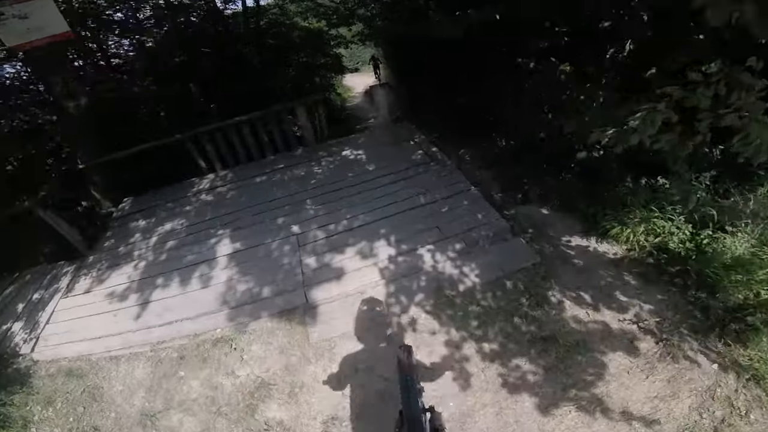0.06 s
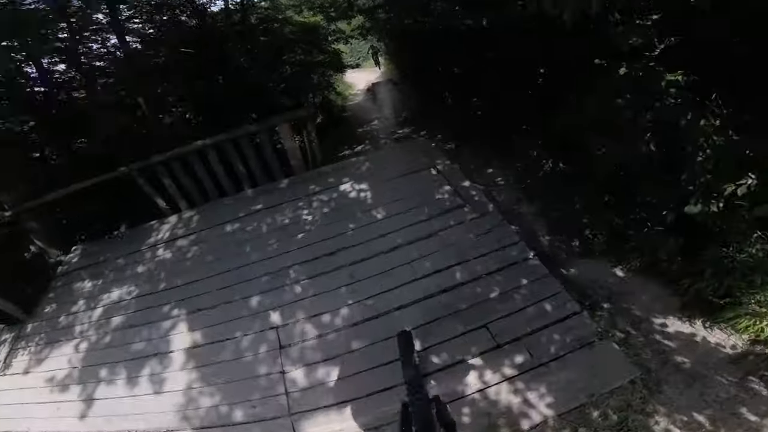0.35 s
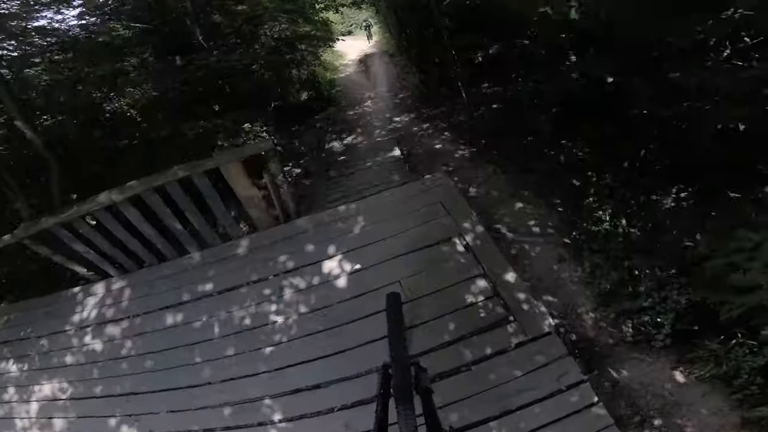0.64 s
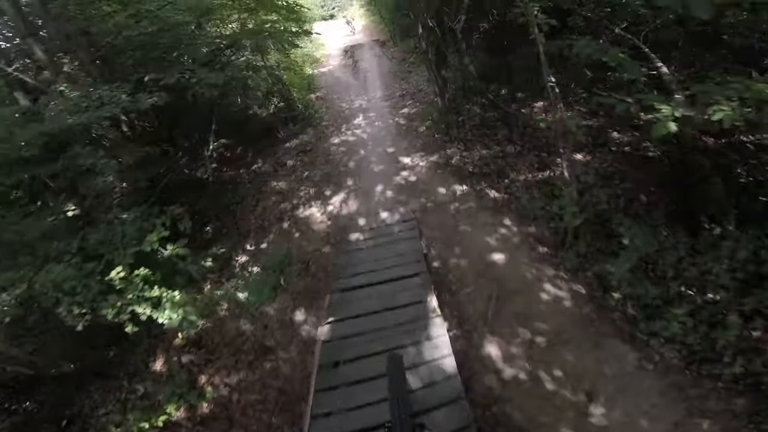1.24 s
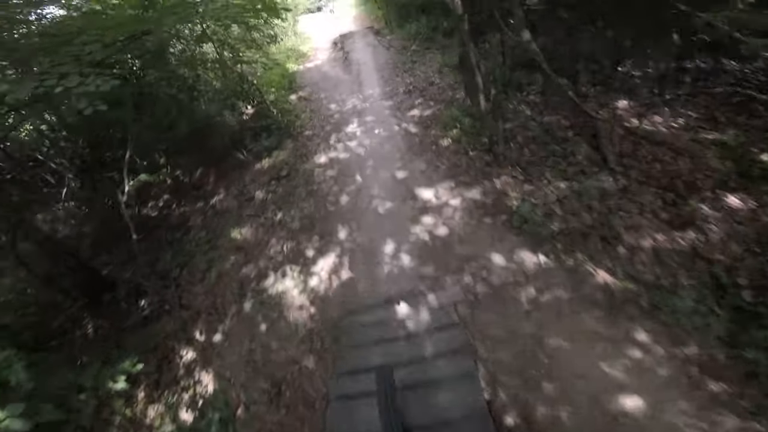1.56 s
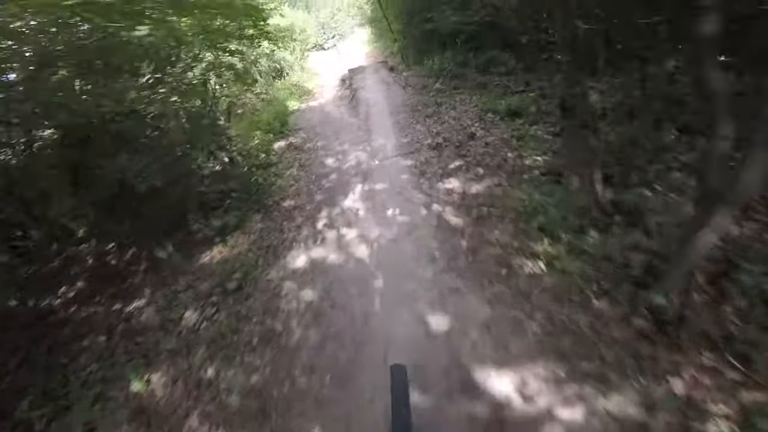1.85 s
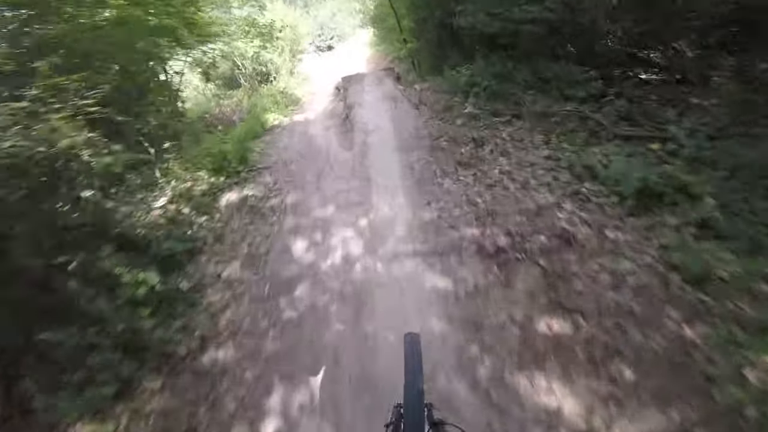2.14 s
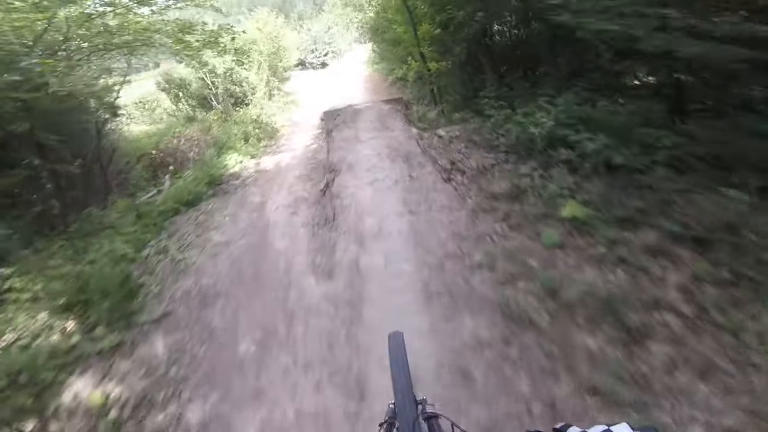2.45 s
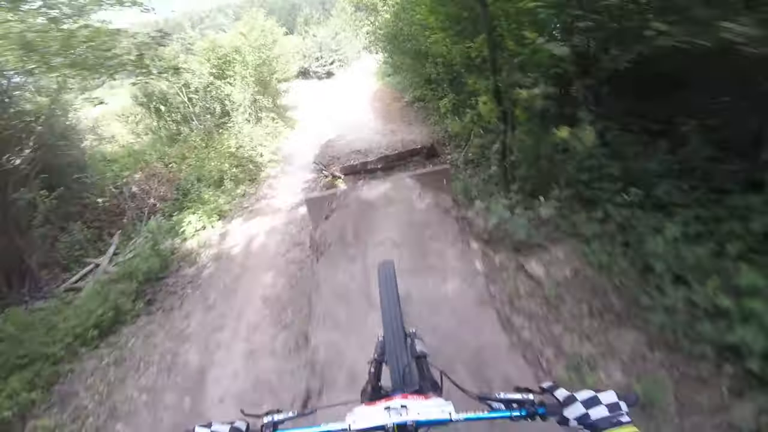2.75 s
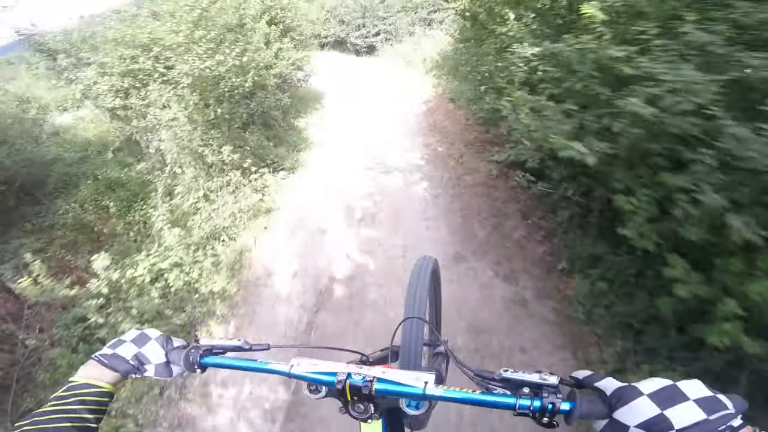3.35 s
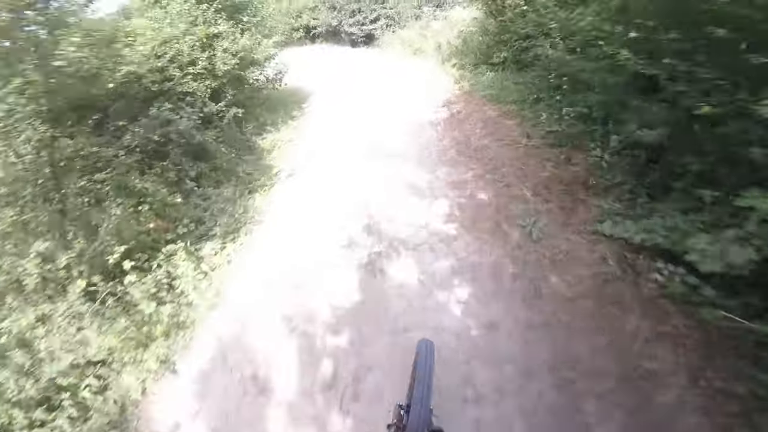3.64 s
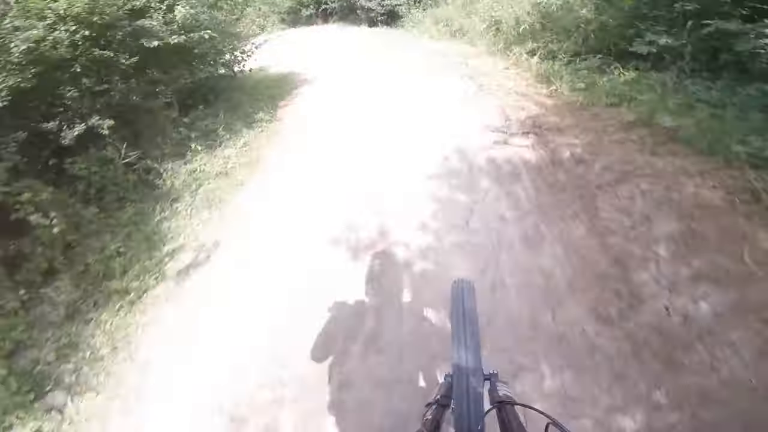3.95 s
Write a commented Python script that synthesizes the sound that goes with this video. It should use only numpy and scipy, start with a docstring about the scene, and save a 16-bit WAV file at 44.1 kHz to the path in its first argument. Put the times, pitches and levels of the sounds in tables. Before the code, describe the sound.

A mountain bike thumps over wooden planks, then rattles along a dirt trail with chain clinks and gritty tyre noise. Wind rushes on the rider's microphone at a jump, and the tyres land in a spray of grit.

```python
"""Mountain bike over planks and a jump

From a camera microphone on the rider, close to the bike: wheels thump over a wooden deck and a narrow
plank ramp, rattle onto dirt, press through the lip of a jump, coast through the air and land in a spray
of grit. Chain and fittings clink, the freewheel ticks, a brake disc sings briefly against its pad
and wind buffets the microphone."""
import sys
import numpy as np
from scipy import signal
from scipy.fft import rfft, irfft, next_fast_len
from scipy.io import wavfile
from scipy.ndimage import uniform_filter1d, map_coordinates

SR = 44100
rng = np.random.default_rng(int(sys.argv[2]) if len(sys.argv) > 2 else 0)


def transcribe(signal):
    """Save signal, clipped to [-1, 1], as a 16-bit WAV file at the path in sys.argv[1]."""
    frames = np.atleast_2d(signal).T
    limited = np.clip(frames, -1, 1)
    pcm = np.round(limited * 32767).astype(np.int16)
    wavfile.write(sys.argv[1], SR, pcm)


N = 176400


def amp(db):
    """Decibels to gain."""
    return 10 ** (np.asarray(db) / 20)


def unit(x):
    """x at rms 1."""
    return x / np.sqrt(np.mean(x ** 2) + 1e-20)


def curve(rows):
    """(s, value) points joined, one value per sample."""
    return np.interp(np.arange(N) / SR, *np.transpose(rows))


def wobble(rate):
    """A smooth random curve, rate knots a second."""
    return map_coordinates(rng.standard_normal(2048), [np.arange(N) * rate / SR], mode="wrap")


def coloured(x, points):
    """x through a causal filter with the given (Hz, dB) shape."""
    m = 2 * next_fast_len(len(x) // 2 + 4096)
    hz, db = np.transpose(points)
    shape = np.interp(np.log(np.fft.rfftfreq(m, 1 / SR) + 1), np.log(hz + 1), db)
    cep = irfft(np.log(amp(shape)), m)
    cep[1:m // 2] *= 2
    cep[m // 2 + 1:] = 0
    return irfft(rfft(x, m) * np.exp(rfft(cep)), m)[:len(x)]


def noise(points):
    """Coloured noise of rms 1."""
    return unit(coloured(rng.standard_normal(N), points))


def fade(t, t60):
    """Exponential decay, 60 dB down after t60."""
    return np.exp(-np.log(1000) * t / max(t60, 1e-4))


def burst(envelope, points):
    """A cluster of tiny contacts under an envelope, coloured, with rms 1 at its loudest."""
    x = coloured(envelope * rng.choice([-1, 1], len(envelope)), points)
    loudest = uniform_filter1d(x * x, size=256).max()
    return x / np.sqrt(loudest)


def add(track, s, x):
    """Mix x into track from time s."""
    part = track[max(round(s * SR), 0):][:len(x)]
    part += x[:len(part)]


# Air on the microphone: buffeting, and the rush at the lip. Each row: time in seconds, level in dB.
BUFFET_LEVEL = [(0, -36.5), (.24, -36), (.35, -23.5), (.44, -37), (1.1, -31.5), (1.7, -38), (2.1, -21),
                (2.3, -33.5), (2.55, -24.5), (3.03, -24.5), (3.35, -41.5), (3.6, -27), (3.78, -30),
                (3.87, -14.5), (4, -22)]
RUSH_LEVEL = [(2.78, -36), (2.86, -28.5), (2.906, -14.5), (2.94, -24), (2.982, -11), (3.057, -15.5),
              (3.085, -22), (3.12, -35), (3.17, -35.5), (3.24, -82)]
# Their spectra. Each row, as in every colour table: frequency in Hz, relative level in dB.
BUFFET_COLOUR = [(8, -7.5), (22, 4.5), (55, -12.5), (160, -32), (2000, -79.5)]
RUSH_COLOUR = [(24, -54), (40, -3.5), (118, 1), (350, -9.5), (569, -11.5), (817, -21.5), (2420, -50),
               (3900, -64), (6600, -100)]

def wind(buffet_gain_db=-2.5):
    """Slow eddies push on the microphone; at the lip of the jump they break into a tearing rush."""
    buffet = amp(curve(BUFFET_LEVEL) + buffet_gain_db + 0.45 * wobble(14)) * noise(BUFFET_COLOUR)
    rush_db = curve([(2.6, -100)] + RUSH_LEVEL + [(3.4, -100)])
    rush = amp(rush_db + 1.5 * wobble(110)) * noise(RUSH_COLOUR)
    return buffet + rush


# Single eddies right on the microphone. Each row: centre in seconds, peak in dB, pitch in Hz.
EDDIES = [(3.49, -16, 39), (3.69, -20, 70), (3.74, -13.5, 45), (3.87, -11.5, 25), (3.943, -15.5, 140)]

def eddies():
    """Each eddy is one short, low swing of pressure."""
    out, t = np.zeros(N), np.arange(N) / SR
    for centre, db, hz in EDDIES:
        cycles = hz * (t - centre)
        out -= amp(db) * np.cos(2 * np.pi * cycles) * np.exp(-(1.27 * cycles) ** 2)
    return out


# A click's spectrum. Each row: frequency in Hz, relative level in dB.
CLICK_COLOUR = [(100, -1.5), (400, -14.5), (2000, -27.5), (7000, -37.5), (13000, -59)]

def click(start_s=.3925, peak_db=-20):
    """A single dry click close to the microphone."""
    impulse = np.zeros(N)
    impulse[round(start_s * SR)] = 1
    snap = coloured(impulse, CLICK_COLOUR)
    return amp(peak_db) * snap / np.abs(snap).max()


# Faint brake rubs down at the hub. Each row: start in seconds, level in dB.
DISC_RUBS = [(1.01, -55), (1.13, -55.5), (1.25, -55.5), (1.37, -53), (1.495, -53), (1.59, -50)]

def brake_disc(pitch_hz=4635, waver_hz=55, rub_s=.12):
    """The turning disc rings thinly, with a wavering pitch, each time it brushes the pad."""
    envelope = np.zeros(N)
    for start, db in DISC_RUBS:
        add(envelope, start, amp(db) * signal.windows.tukey(int(rub_s * SR), .8))
    phase = 2 * np.pi * np.cumsum(pitch_hz + waver_hz * wobble(400)) / SR
    return envelope * unit(amp(3.7 * wobble(120)) * np.sin(phase))


# The freewheel in the rear hub. Each row: time in seconds, ticks per second.
TICK_RATE = [(1.5, 50.6), (3.25, 58), (3.65, 75)]
# Grit and drivetrain below the rider. Each row: time in seconds, relative level in dB.
HISS_LEVEL = [(0, -52), (.3, -60.5), (.43, -61.5), (.47, -51.5), (.6, -46), (.72, -59.5), (.77, -48),
              (1.1, -53.5), (1.2, -56.5), (1.55, -52.5), (1.68, -49), (2.03, -48.5), (2.3, -54),
              (2.9, -50.5), (3.08, -59), (3.77, -55.5), (3.86, -47.5), (4, -47.5)]
HISS_COLOUR = [(150, -33.5), (500, 6), (1700, -10.5), (2200, 1.5), (2750, 0), (3300, -9), (3900, -14.5),
               (4600, -0.5), (5600, -5.5), (6500, -15.5), (8000, -16), (13500, -48)]

def grit_and_freewheel(grains_per_s=460, grit_db=-6, tick_db=-5, gain_db=2.5):
    """Grit crackles under the tread over a fine hiss, and the freewheel ticks tooth by tooth."""
    grit = (rng.random(N) < grains_per_s / SR) * rng.choice([-1, 1], N)
    grit = grit * amp(5.5 * np.minimum(rng.exponential(size=N), 4))  # a few grains stand out
    teeth_passed = np.floor(np.cumsum(curve(TICK_RATE) * (1 + .04 * wobble(15))) / SR)
    strikes = np.diff(teeth_passed, prepend=0) * amp(3.7 * wobble(90))
    t = np.arange(SR // 40) / SR
    ticks = signal.fftconvolve(strikes, fade(t, t60=0.013) * rng.standard_normal(len(t)))[:N]
    crackle = amp(grit_db) * unit(coloured(grit, HISS_COLOUR))
    ticking = amp(tick_db) * unit(coloured(ticks, HISS_COLOUR))
    envelope = amp(curve(HISS_LEVEL) + gain_db + 1.8 * wobble(22.6))
    return envelope * (noise(HISS_COLOUR) + crackle + ticking)


# Quiet rasps from the bike. Each row: start in seconds, length in seconds, level in dB.
RASPS = [(0.249, 0.069, -46), (3.347, 0.081, -48.5), (3.6, 0.16, -48)]
RASP_COLOUR = [(500, -20), (1700, -18), (2300, 3), (2700, 1), (3300, -21), (5000, -20.5), (9000, -36),
               (13000, -46)]

def rasps():
    """Tread and drivetrain rasp in short, grainy swells."""
    envelope = np.zeros(N)
    for start, length, db in RASPS:
        add(envelope, start, amp(db) * signal.windows.tukey(int(length * SR), .5))
    return envelope * amp(4.8 * wobble(180)) * noise(RASP_COLOUR)


# Gravel patches on the trail. Each row: start in seconds, level in dB.
CRUNCHES = [(2.236, -37), (2.349, -34), (2.393, -35.5), (2.478, -35.5), (2.63, -38), (2.664, -30),
            (2.712, -31.5), (2.755, -44), (2.806, -29)]
CRUNCH_COLOUR = [(300, -15), (1100, 5), (2300, 9.5), (3300, -13), (8000, -25.5), (12000, -58)]

def gravel(attack_s=0.0032):
    """The tread crunches over each patch in a short cluster of uneven grains."""
    out, t = np.zeros(N), np.arange(SR // 8) / SR
    swell = (1 - np.exp(-t / attack_s)) * fade(t, t60=.09)
    for start, db in CRUNCHES:
        grains = swell * rng.exponential(size=len(t)) ** 2
        add(out, start, amp(db) * burst(grains, CRUNCH_COLOUR))
    return out


# Tyre roar and ground rumble from under the rider. Each row: time in seconds, relative level in dB.
ROAR_LEVEL = [(0, -48.5), (.22, -47.5), (.43, -52), (.48, -49.5), (.72, -45), (1.05, -44), (1.2, -50),
              (1.54, -46.5), (1.62, -40.5), (1.93, -33), (2.1, -36.5), (2.4, -38.5), (2.62, -36),
              (2.92, -28.5), (3.1, -49), (3.5, -51), (3.77, -45.5), (3.83, -35), (4, -35)]
RUMBLE_LEVEL = [(.2, -58.5), (.43, -49), (.48, -34), (.57, -27), (.95, -32.5), (1.15, -38), (1.3, -42),
                (1.52, -39.5), (1.65, -39), (1.94, -30), (1.98, -18), (2.03, -35.5), (2.22, -36),
                (2.3, -39.5), (2.8, -35), (3.12, -26.5), (3.38, -39.5), (3.7, -30.5), (4, -29.5)]
DIRT_COLOUR = [(120, -45.5), (200, -1), (280, 4), (474, -0.5), (849, -8), (1050, -1), (1690, -7),
               (2240, -3), (2860, -13), (3410, -28.5), (5210, -22.5), (10700, -47), (13000, -109)]
RUMBLE_COLOUR = [(25, 3), (115, 7), (170, 0), (450, -16.5), (800, -19), (2000, -60.5)]

def tyres(roar_gain_db=0.5):
    """Knobbly tread roars unevenly while the ground and the frame rumble."""
    flutter_db = 2.2 * wobble(24.84) + 2.6 * wobble(220)
    roar = amp(curve(ROAR_LEVEL) + roar_gain_db + flutter_db) * noise(DIRT_COLOUR)
    rumble = amp(curve(RUMBLE_LEVEL) + 3 * wobble(35)) * noise(RUMBLE_COLOUR)
    return roar + rumble


def stones(per_s=55, spread_db=11, gain_db=-6):
    """Small stones and ruts rattle the bike at random, harder as the tyres load up and roar."""
    jolts, t = np.zeros(N), np.arange(SR // 20) / SR
    count = int(per_s * N / SR)
    for k, (lag, size) in enumerate(rng.random((count, 2))):
        add(jolts, (k + 2 * lag) / per_s, amp(spread_db * size) * fade(t, t60=0.029))
    rattle = unit(coloured(jolts * rng.standard_normal(N), DIRT_COLOUR))
    return amp(curve(ROAR_LEVEL) + gain_db) * rattle


# Bright clinks, close by. Each row: start in seconds, relative level in dB, 60 dB decay in seconds.
CLINKS = [(0.4552, -25, 0.073), (0.5913, -27.5, 0.039), (1.1314, -33.5, 0.044), (1.332, -30.5, 0.042),
          (1.4154, -32.5, 0.069), (1.5458, -23, 0.038), (1.725, -16, 0.02), (1.9612, -26, 0.11),
          (2.040, -20, 0.089), (2.14, -25.5, 0.065), (2.2004, -30.5, 0.049), (2.41, -34, 0.05),
          (2.822, -22, 0.067), (3.835, -20.5, 0.092), (3.86, -17, 0.081), (3.944, -32, 0.077)]
CLINK_COLOUR = [(300, -65), (2500, 21.5), (3500, 0), (4700, 15), (5700, 12), (6600, 1), (10000, -12.5),
                (14000, -66)]

def clinks(gain_db=-7.5):
    """Chain and fittings strike metal."""
    out, t = np.zeros(N), np.arange(SR // 5) / SR
    for start, db, t60 in CLINKS:
        add(out, start, amp(db + gain_db) * burst(fade(t, t60), CLINK_COLOUR))
    return out


# Clatter on the bike, close by. Each row: start in seconds, level in dB, 60 dB decay of the clatter
# in seconds, pitch of the struck part in Hz.
SLAPS = [(0.7351, -29, 0.018, 2100), (1.263, -36.5, 0.24, 1240), (1.437, -34, 0.067, 1346),
         (1.521, -28, 0.1, 1450), (1.590, -26, 0.25, 1136), (1.631, -16, 0.07, 1220),
         (1.664, -25, 0.24, 1200), (1.705, -20, 0.15, 940), (1.723, -18, 0.19, 1144),
         (1.745, -30, 0.17, 740), (1.887, -19.5, 0.083, 1103), (1.906, -24, 0.2, 735),
         (3.319, -27, 0.03, 694), (3.7912, -21.5, 0.015, 2470), (3.835, -26, 0.077, 1140)]
SLAP_COLOUR = [(100, -13), (250, -6.5), (750, -10), (1250, -11), (1800, -21), (2500, -20.5), (3400, -35),
               (5000, -36.5), (13000, -72)]

def slaps(attack_s=0.00038, ring_db=2.5):
    """Chain, cables and frame clatter; each slap briefly rings the part that it hits."""
    out, t = np.zeros(N), np.arange(SR // 5) / SR
    rise = 1 - np.exp(-t / attack_s)
    for start, db, t60, hz in SLAPS:
        clatter = burst(rise * fade(t, t60), SLAP_COLOUR)
        ring = rise * fade(t, t60=.035) * np.sin(2 * np.pi * hz * t)
        add(out, start, amp(db) * (clatter + amp(ring_db) * ring))
    return out


# Touchdown beyond the jump. Each row: start in seconds, level in dB, attack and 60 dB decay in seconds.
LANDINGS = [(3.791, -23, 0.0004, 0.21), (3.808, -25, 0.023, 0.12), (3.860, -24.5, 0.0025, 0.052),
            (3.904, -31, 0.0031, 0.061)]
LANDING_COLOUR = [(150, -44), (250, 16.5), (586, 13), (740, 0), (1600, 10.5), (2300, 13.5), (3800, -4),
                  (4560, 0.5), (10200, -24.5), (13500, -87)]

def landing():
    """The tyres bite one after the other and scatter dirt."""
    out, t = np.zeros(N), np.arange(SR // 4) / SR
    for start, db, attack, t60 in LANDINGS:
        envelope = (1 - np.exp(-t / attack)) * fade(t, t60)
        add(out, start, amp(db) * burst(envelope, LANDING_COLOUR))
    return out


# Wheels striking boards and bumps just below the microphone. Each row: start in seconds,
# relative level in dB, weight of the thud in dB, 60 dB decay of the rattle in seconds.
KNOCKS = [(0.449, -20, -8, .04), (0.452, -4, -3, 0.095), (.509, -13.5, -0.5, 0.15), (.543, -14, -14, 0.02),
          (.548, -13.5, 0, 0.12), (.619, -16.5, 5.5, 0.11), (0.7402, -0.5, -8, 0.086), (.826, -12, 0, 0.25),
          (.834, -17.5, 6.5, 0.053), (.913, -19.5, 8.5, 0.21), (1.023, -22, -1, 0.29),
          (1.049, -15.5, -3, 0.19), (1.35, -23, -2.5, 0.25), (1.63, -20.5, 7, 0.02),
          (1.778, -13.5, 6.5, 0.018), (1.95, -12.5, 9, 0.015), (2.91, -14.5, 1, 0.033)]
CLACK_COLOUR = [(60, -33.5), (200, -1.5), (400, 6.5), (700, 5.5), (1000, 8), (1400, 0), (2500, -11),
                (3400, -28.5), (5000, -23), (9000, -47), (14000, -85)]
THUD_COLOUR = [(30, -10), (110, -2.5), (300, -3), (500, -11), (2000, -62)]
# Resonances of boards and frame. Each row: frequency in Hz, width in Hz, relative level in dB.
BODY_MODES = [(111, 25, -12), (304, 18, 1), (455, 45, 9), (720, 67, 1), (900, 52, -5), (1120, 51, 8)]

def wheel_knocks(attack_s=.0003, gain_db=-8, rattle_db=-7, thud_db=-4, ring_db=-17.5):
    """Each blow is a hard clack, a dying rattle, a low thud and a short ring of boards and frame."""
    out, t = np.zeros(N), np.arange(SR // 4) / SR
    rise = 1 - np.exp(-t / attack_s)
    for start, db, weight_db, rattle_t60 in KNOCKS:
        blow_and_rattle = fade(t, t60=.02) + amp(rattle_db) * fade(t, rattle_t60)
        clack = burst(rise * blow_and_rattle, CLACK_COLOUR)
        thud = amp(weight_db + thud_db) * burst(rise * fade(t, t60=0.12), THUD_COLOUR)
        ring = np.zeros(len(t))
        for k, (hz, width, mode_db) in enumerate(BODY_MODES):
            strength = (-1) ** k * amp(mode_db + 2 * rng.standard_normal())
            pitch = hz * rng.normal(1, 0.055)
            ring += strength * np.exp(-np.pi * width * t) * np.sin(2 * np.pi * pitch * t)
        add(out, start, amp(db + gain_db) * (clack + thud + amp(ring_db) * rise * ring))
    return out


def scene():
    """Everything reaches the one microphone from close by."""
    impacts = wheel_knocks() + slaps() + clinks() + landing()
    rolling = tyres() + stones() + gravel() + rasps() + grit_and_freewheel() + brake_disc()
    return (impacts + rolling + click() + wind() + eddies())[None]


def record(dry, ceiling=.92, top_hz=13900):
    """The camera rounds off the highest peaks and cuts the top treble; the ends are eased."""
    rounded = dry / (1 + np.abs(dry / ceiling) ** 8) ** (1 / 8)
    eased = rounded * signal.windows.tukey(N, .002)
    lowpass = signal.butter(16, top_hz, fs=SR, output="sos")
    return signal.sosfiltfilt(lowpass, eased, padlen=2048)


dry = scene()
out = record(dry)
transcribe(out)
```